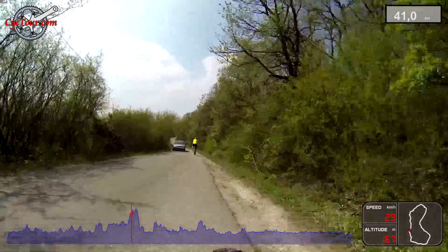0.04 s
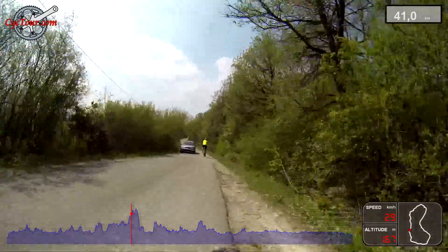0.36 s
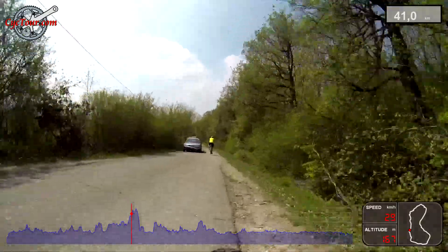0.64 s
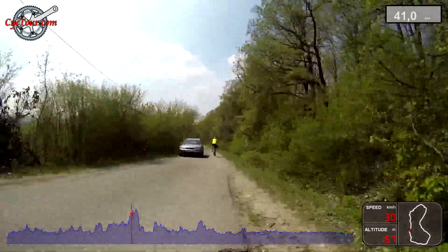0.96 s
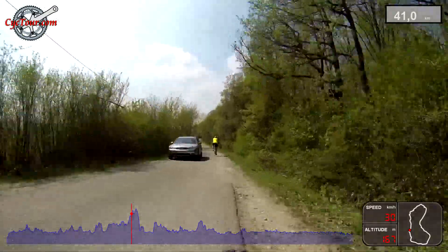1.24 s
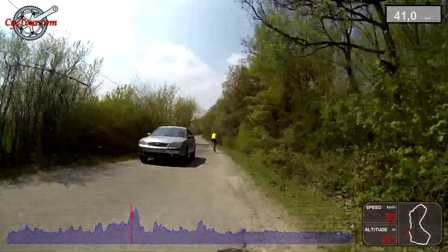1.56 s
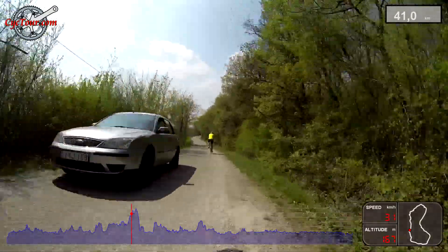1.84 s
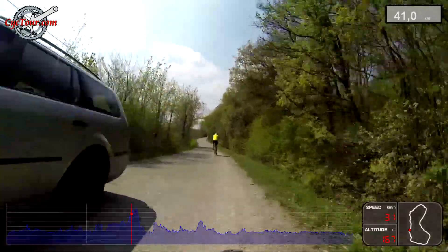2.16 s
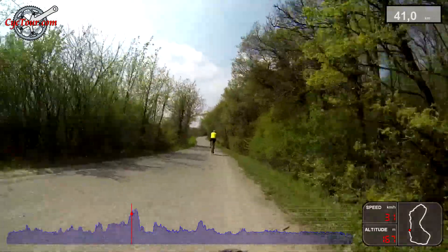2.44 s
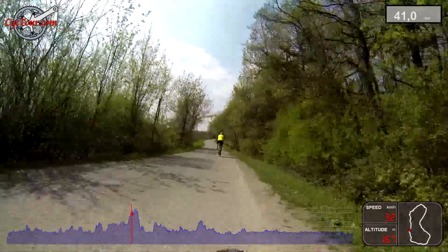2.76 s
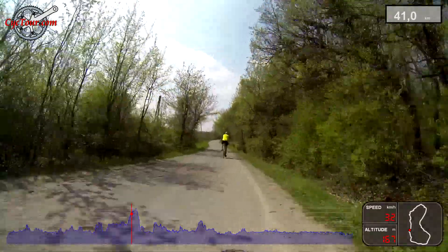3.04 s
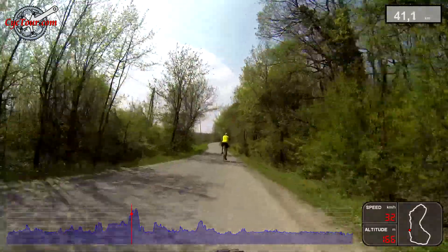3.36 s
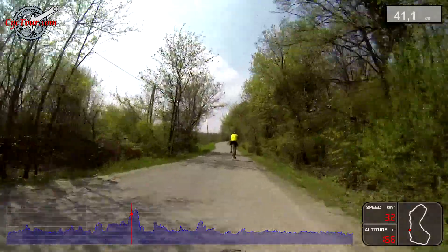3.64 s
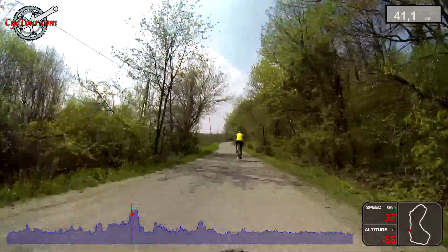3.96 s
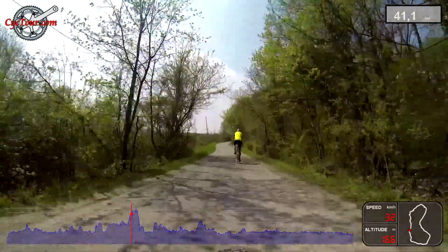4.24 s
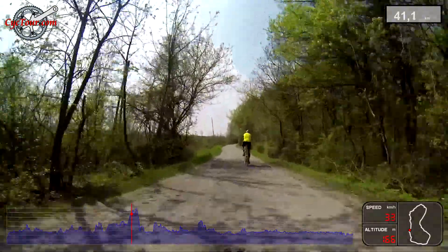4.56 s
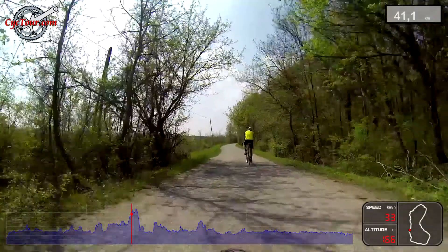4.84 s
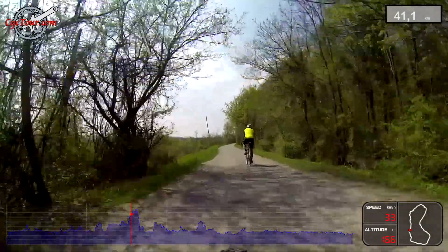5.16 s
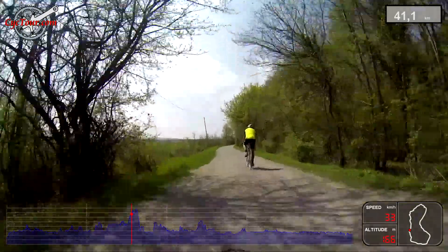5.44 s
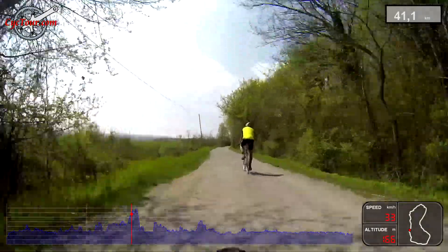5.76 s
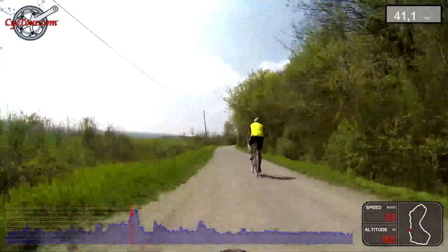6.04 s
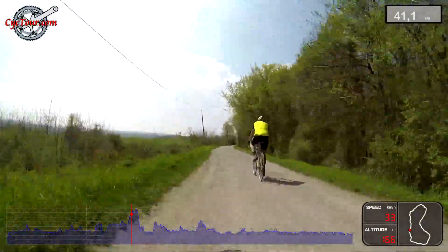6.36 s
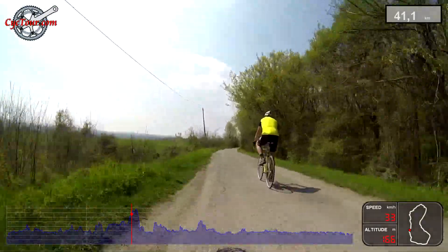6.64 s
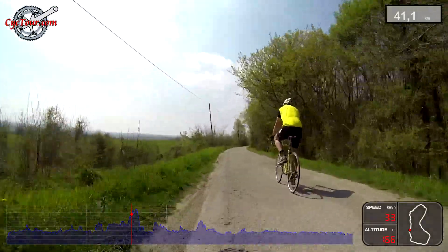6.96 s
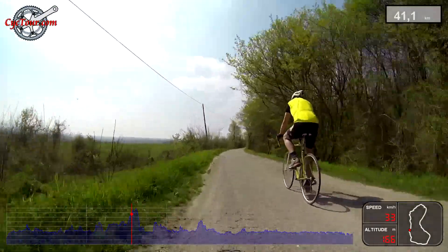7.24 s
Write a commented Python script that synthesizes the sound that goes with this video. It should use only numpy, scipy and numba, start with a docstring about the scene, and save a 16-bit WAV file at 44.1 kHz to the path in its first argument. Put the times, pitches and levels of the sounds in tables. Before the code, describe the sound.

Low wind rumble and a fast, hollow rattle from a rolling bicycle, with bumps, small ticks and one passing car.

```python
"""A country lane, heard from a camera in a plastic housing on a moving bicycle. Wind buffets the
microphone, rough asphalt rattles mount and housing, and bumps knock on it over a rush of air and tyres.
Grit and loose parts tick and jangle; an oncoming car swishes past with a deep boom of pushed air.
Hard jolts and wind pops overload the microphone: the gain control ducks and creeps back."""
import sys
import numpy as np
from scipy import signal
from scipy.fft import rfft, irfft
from scipy.io import wavfile
from scipy.ndimage import map_coordinates
from numba import njit

SR = 44100
rng = np.random.default_rng(int(sys.argv[2]) if len(sys.argv) > 2 else 0)


def store_wav(level_fs):
    """Save 16-bit WAV to argv[1]."""
    pcm = np.round(np.clip(np.atleast_2d(level_fs), -1, 1) * 32767)
    wavfile.write(sys.argv[1], SR, pcm.T.astype(np.int16))


N = 325899

# bright snap of grit and small contacts: f/Hz, relative level/dB
SNAP_SPECTRUM = [(1200, -5.5), (2000, 1.5), (3900, 5.5), (4800, 0), (6000, 2), (7600, -7.5), (9300, -3.5),
                 (10600, -10), (12000, -12), (15000, -32.5)]
# ringing modes of the loose parts: f/Hz, energy share/dB, t60/s
PART_MODES = [(1530, -9, 0.011), (2108, -3.5, 0.018), (2430, -9.5, 0.029), (2924, -11, 0.026),
              (2920, -2.5, 0.0024), (3724, -9, 0.018), (5480, -27.5, 0.017), (9100, -36.5, .014)]


def wind(eddies, gusts_per_s=10, gust_db=1):
    """Turbulence on the microphone port: a low roar in quick lumps."""
    # rise and fall of the buffeting: t/s, level/dB
    gusts = [(0.0, -18.5), (0.12, -17), (0.24, -27), (0.32, -22.5), (0.38, -16), (0.76, -17.5), (1.56, -16),
             (1.64, -20.5), (1.76, -20), (2.58, -18), (2.76, -16), (2.88, -16.5), (3.0, -19), (3.12, -14.5),
             (3.36, -20), (3.48, -14), (3.78, -19.5), (3.9, -16), (3.98, -16.5), (4.38, -18.5), (4.74, -17),
             (4.98, -20), (5.24, -15.5), (5.4, -17.5), (6.84, -16.5), (7.06, -19.5), (7.2, -11.5),
             (7.39, -19)]
    # colour of the roar: f/Hz, relative level/dB
    buffet_spectrum = [(11, -36.5), (18, 1), (38, 1), (65, -2.5), (151, -6.5), (245, -9), (370, -13.5),
                       (416, -11), (518, -17.5), (600, -21.5), (780, -49), (1320, -120)]
    level_db = curves(gusts)[0] + gust_db * wobble(gusts_per_s)
    lumps = amp(.5 * eddies + .6 * wobble(45))
    return amp(level_db) * unit(lumps * noise(buffet_spectrum))


def rattle(level_db, eddies, drone_hz=735, drone_q=6, waver_db=1.5):
    """Asphalt grain shakes the mount; each little blow rings the hollow housing."""
    # resonances of the housing: f/Hz, relative level/dB
    housing_spectrum = [(180, -29.5), (300, -11), (371, -2.5), (416, -8), (487, -10.5), (520, -4),
                        (600, -6), (700, 0.96), (785, 1), (865, 0.5), (1050, -16), (1150, -22), (1500, -47),
                        (2530, -120)]
    # one resonance drones more on some stretches: t/s, lift/dB
    drone_lift = [(0, -0.5), (.3, -0.5), (.6, 0), (3.3, -1), (3.6, 1.5), (5.2, 0.5), (5.6, 1.5),
                  (7.39, 0.5)]
    blows = impacts(rate=480, spread_db=3)
    body = unit(coloured(blows + rng.standard_normal(N), housing_spectrum))
    drone = signal.lfilter(*signal.iirpeak(drone_hz, drone_q, fs=SR), body)
    lift_db = curves(drone_lift)[0] + waver_db * wobble(12)
    return amp(level_db + 0.5 * eddies) * (body + (amp(lift_db) - 1) * drone)


def knocks(upper_ratio=1.86, upper_db=-25, tail_db=-15, tail_t60=0.046):
    """Each knock drives two resonances of the housing for a few cycles; a weak ring follows."""
    # knocks on the housing, some rung by the jolts and pops: t/s, peak level/dB, swell and fade time/s, f/Hz
    hits = [(.178, -7, 0.0032, 720), (.205, 2, .0022, 780), (.215, -7, 0.0026, 740), (.262, -9, .003, 700),
            (.2695, -3, 0.0042, 830), (.279, -6, 0.0036, 720), (0.346, 0, 0.00083, 1010),
            (.3518, 2.5, 0.00075, 850), (.572, -10, 0.0033, 780), (.772, -7.5, 0.0024, 800),
            (1.582, -3.5, 0.0013, 850), (1.834, -4, 0.0017, 800), (2.010, -6.5, 0.0047, 790),
            (2.1555, -2.5, 0.002, 705), (2.540, 11.5, .0016, 770), (3.348, -7, 0.0029, 760),
            (3.529, -8, 0.0034, 740), (3.705, -3, 0.0022, 730), (4.319, -8.5, 0.0038, 740),
            (4.355, -6, .0034, 780), (4.476, -5, 0.002, 760), (4.936, -3, .002, 780),
            (5.058, -5.5, 0.0032, 750), (5.609, -11, 0.0022, 780), (5.874, -13, .002, 780),
            (5.8935, 4.5, 0.0031, 780), (6.055, -6, 0.0024, 760), (6.38, -7, 0.0021, 780)]
    out, t = np.zeros(N), np.arange(-SR // 25, SR // 15) / SR
    for s, db, width, hz in hits:
        tone = np.cos(2 * np.pi * hz * t) + amp(upper_db) * np.sin(2 * np.pi * upper_ratio * hz * t)
        blow = 1 / np.cosh(np.clip(2 * t / width, -20, 20))
        tail = (t > 0) * amp(tail_db - 60 * np.abs(t) / tail_t60)
        add(out, s + t[0], amp(db) * np.maximum(blow, tail) * tone)
    return out


def pops(push_s=0.0015):
    """Each pop is one push and pull of pressure with a tight crack on top."""
    # hard jolts and eddies on the microphone port: t/s, push level/dB, crack level/dB
    jolts = [(0.3466, 4, 4.5), (0.3512, -3.5, 6), (1.582, 0, -6), (1.5849, -8.5, -10), (1.834, -7, -7.5),
             (2.155, 1, -4.5), (2.158, 2, -6), (3.905, -7, -31), (5.7492, -12, -14)]
    # colour of the crack: f/Hz, relative level/dB
    crack_spectrum = [(200, -14.5), (900, 9.5), (1500, 4.5), (2600, 0), (3600, -10.5), (4500, -18),
                      (8000, -37.5), (14000, -37.5)]
    out, u = np.zeros(N), np.arange(SR // 25) / SR / push_s
    push_pull = u * u * (2 - u) * np.exp(2 - 2 * u)
    for s, db, _ in jolts:
        add(out, s - push_s / 2, amp(db) * push_pull)
    times, _, crack_db = np.transpose(jolts)
    return out + coloured(bursts(times - .0005, crack_db, t60=.007, rise_s=.0001), crack_spectrum)


def rush(level_db, eddies, grain_db=-7):
    """Air and tyres hiss through the housing wall, crackling with asphalt grain, fluttering with eddies."""
    # colour of the hiss: f/Hz, relative level/dB
    rush_spectrum = [(700, -39.5), (1050, 0.5), (1500, 0.5), (1900, -5.5), (2650, -12.5), (2950, -18.5),
                     (3450, -19), (3900, -19.5), (4500, -34.5), (5500, -35), (7400, -49), (9200, -49.5),
                     (10800, -58.5), (14000, -84)]
    flutter = amp(1.7 * eddies + 1.1 * wobble(160))
    drive = rng.standard_normal(N) + amp(grain_db) * impacts(rate=980, spread_db=4.0)
    return amp(level_db) * unit(flutter * coloured(drive, rush_spectrum))


def surge(first_stroke_s=.305, stroke_db=0.61, patches_per_s=9, patch_db=0.59):
    """Swing of the rolling noise in dB: regular swells, plus chance patches of coarser asphalt."""
    # pace of the swells, likely the pedal strokes: t/s, rate/Hz
    cadence = [(3.4, 2.8), (3.7, 3.53), (5.9, 3.53), (6.2, 2.7)]
    rate, = curves(cadence)
    strokes = np.cumsum(rate) / SR - first_stroke_s * rate[0]
    return stroke_db * np.cos(2 * np.pi * strokes) + patch_db * wobble(patches_per_s)


def ticks(snap_t60=0.016, scrape=2.5):
    """Grit and loose parts hit the frame: a bright snap, drawn out by the chatter, and a short ring."""
    # contacts: t/s, relative snap level/dB, clack level/dB, chatter length/s, tilt/(dB per octave)
    contacts = [(0.048, -37, -26, 0.0025, -3), (0.095, -57, -26.5, 0.0053, -1),
                (0.2025, -36.5, -17.5, 0.0082, -13), (0.243, -50, -21, 0.0032, -2),
                (0.257, -66, -19, 0.01, -10), (0.331, -53, -23, 0.0034, 3), (0.504, -46, -29, 0.0036, 7),
                (0.613, -66.5, -30.5, 0.0028, 5), (0.847, -63, -22.5, .012, -9), (0.9, -49, -37, .003, 2),
                (1.077, -50, -31, 0.0025, -3), (1.254, -52, -28, 0.004, 2), (1.318, -53, -31, 0.0038, 4),
                (1.441, -40, -19.5, .006, -1), (1.562, -48, -32, 0.0038, 2), (1.611, -42.5, -32, 0.0024, 8),
                (1.857, -49, -29, 0.0027, 0), (1.869, -46, -16.5, 0.008, -8), (2.136, -41, -27, 0.0035, 0),
                (2.205, -38.5, -16, 0.019, -14), (2.265, -47, -21, 0.0038, -1),
                (2.454, -45, -23.5, .008, 0), (2.623, -42, -19, 0.0071, -2), (3.493, -41, -18, 0.0049, -5),
                (3.5738, -50.5, -28.5, 0.0024, -6), (3.591, -49, -33, .001, -2),
                (3.702, -50, -32, 0.00091, -2), (3.796, -42, -21.5, 0.0086, 4), (3.864, -48, -32, 0.001, 0),
                (3.902, -50, -33, .001, 0), (4.04, -44, -29, .003, -4), (4.152, -52, -37, .001, 1),
                (4.179, -54, -32, .002, -2), (4.28, -40, -18.5, 0.0065, -8), (4.46, -47, -32, .004, 5),
                (4.63, -39.5, -26, 0.0053, 1), (4.86, -54, -29.5, .003, 2), (5.056, -42, -22.5, .003, -1),
                (5.752, -50, -18.5, 0.002, -5), (6.089, -42, -36, 0.0012, 14),
                (6.217, -54, -43, 0.0034, -2), (6.6203, -46, -14.5, .002, -2),
                (6.7424, -33, -9.5, 0.0028, 0), (6.9755, -41, -30, 0.003, 14),
                (7.3265, -48, -32, 0.0026, 4), (7.369, -32, -8, 0.00065, 2)]
    times, snap_db, _, chatter, _ = np.transpose(contacts)
    snaps = bursts(times, snap_db + 3.5, t60=snap_t60 + scrape * chatter, rise_s=.0005)
    out = coloured(snaps, SNAP_SPECTRUM)
    for s, _, db, chatter_s, tilt_db in contacts:
        add(out, s, amp(db) * clack(chatter_s, tilt_db))
    return out


def clack(chatter_s, tilt_db, count=4, detune=.015, loose_s=0.0055, rebound_fade_db=-2.5):
    """A loose part strikes; the longer it chatters, up to loose_s, the stronger its uneven rebounds."""
    modes = ring(detune)
    looseness = min(chatter_s / loose_s, 1)
    for fraction in (np.arange(count) + rng.random(count)) / count:
        strength = looseness * amp(rebound_fade_db * fraction)
        for mode, rebound in zip(modes, ring(detune)):
            add(mode, fraction * chatter_s, strength * rebound)
    return voiced(modes, tilt_db)


def ring(detune, rise_s=0.00049):
    """One blow on the loose parts: a row for each dying mode, its pitch scattered by detune."""
    t = np.arange(SR // 12) / SR
    hz, _, t60 = np.transpose(PART_MODES)[:, :, None]
    hz = hz * (1 + detune * rng.standard_normal(hz.shape))
    attack = (1 - np.exp(-t / rise_s)) ** 2
    return attack * amp(-60 * t / t60) * np.sin(2 * np.pi * hz * t)


def voiced(modes, tilt_db):
    """Mix the modes by their energy shares; a harder contact favours the high ones."""
    hz, share_db, _ = np.transpose(PART_MODES)
    octaves = np.clip(np.log2(hz / np.median(hz)) + .2, -.5, .5)
    gains = amp(share_db + tilt_db * octaves) / np.linalg.norm(modes, axis=1)
    return np.sqrt(SR / 1000) * gains @ modes  # 0 dB is the energy of 1 ms at full scale


def car(closest_s=2.084, approach_s=0.15, leave_s=0.16, peak_db=-31.5):
    """Tyre hiss of the oncoming car swells as it nears and fades behind the bicycle."""
    # colour of the car's tyres: f/Hz, relative level/dB
    tyre_spectrum = [(500, -17.5), (1100, 10), (2000, 1.5), (3000, 4.5), (3900, -3), (4600, -15.5),
                     (5600, -15), (7800, -33.5), (9300, -24.5), (11000, -40), (15000, -48.5)]
    t = np.arange(N) / SR - closest_s
    distance = np.hypot(1, t / np.where(t < 0, approach_s, leave_s))
    return amp(peak_db) / distance ** 1.5 * noise(tyre_spectrum)  # spreading plus loss over the verge


def wake(centre_s=1.9, width_s=0.11, peak_db=-18):
    """Air pushed aside by the car throbs on the microphone as a deep boom."""
    # the car's pressure wave: f/Hz, relative level/dB
    boom_spectrum = [(18, -24), (32, -7), (42, 5), (55, -16.5), (100, -39), (400, -120)]
    t = np.arange(N) / SR - centre_s
    return amp(peak_db) * np.exp(-.5 * (t / width_s) ** 2) * noise(boom_spectrum)


def jangle(grit_count=45):
    """Loose parts chatter against the frame, with a faint patter of fine grit."""
    # chatter flares on broken stretches of road, then settles: t/s, level/dB
    chatter_levels = [(0, -41), (.1, -42), (.16, -48.5), (.21, -39), (.265, -38), (.3, -51), (.36, -42),
                      (.5, -49.5), (3.75, -49), (3.81, -43), (3.95, -50), (4.3, -44), (4.7, -51),
                      (5.13, -46), (5.3, -49), (7.39, -46.5)]
    level_db, = curves(chatter_levels)
    blows = impacts(rate=260, spread_db=6.5)
    chatter = unit(signal.fftconvolve(blows, voiced(ring(detune=0), tilt_db=0))[:N])
    when, size = rng.random((grit_count, 2)).T
    grit = bursts(when * N / SR, -59 + 8 * size, t60=0.014, rise_s=.0003)
    return amp(level_db) * chatter + coloured(grit, SNAP_SPECTRUM)


def amp(db):
    """Decibels to gain."""
    return 10 ** (np.asarray(db) / 20)


def unit(x):
    """Scale to rms 1."""
    return x / np.sqrt(np.mean(x ** 2) + 1e-20)


def curves(rows):
    """One value per sample for each column after the time."""
    times, *columns = np.transpose(rows)
    return [np.interp(np.arange(N) / SR, times, column) for column in columns]


def wobble(rate):
    """A smooth random curve, rate knots a second."""
    return map_coordinates(rng.standard_normal(int(N * rate / SR) + 4), [np.arange(N) * rate / SR])


def coloured(x, spectrum, size=16384):
    """x through a causal filter of energy 1, shaped by rows of f/Hz, level/dB."""
    hz, db = np.transpose(spectrum)
    grid = np.fft.rfftfreq(size, 1 / SR)
    gain = amp(np.interp(np.log(grid + 1), np.log(hz + 1), db))
    cepstrum = irfft(np.log(gain + 1e-6))
    cepstrum[1:size // 2] *= 2  # minimum phase keeps attacks sharp
    cepstrum[size // 2 + 1:] = 0
    response = irfft(np.exp(rfft(cepstrum)))
    return signal.fftconvolve(x, response / np.linalg.norm(response))[:N]


def noise(spectrum):
    """Coloured noise of rms 1."""
    return unit(coloured(rng.standard_normal(N), spectrum))


def impacts(rate, spread_db):
    """Randomly timed impulses of uneven size, rms 1."""
    hit = rng.random(N) < rate / SR
    size = amp(spread_db * np.clip(rng.standard_normal(N), -2, 2))
    return unit(hit * size * rng.choice([-1, 1], N))


def bursts(times, levels_db, t60, rise_s):
    """Short scraping contacts: white noise that builds and dies after each time."""
    envelope, t = np.zeros(N), np.arange(SR // 10) / SR
    for s, db, life in np.broadcast(times, levels_db, t60):
        add(envelope, s, amp(db - 60 * t / life) * (1 - np.exp(-t / rise_s)))
    return envelope * rng.choice([-1, 1], N)


def add(track, s, sound):
    """Mix a sound into the track from time s on."""
    part = track[max(round(s * SR), 0):][:len(sound)]
    part += sound[:len(part)]


@njit
def ducking(excess, attack, release):
    """Gain reduction in dB: chases any excess quickly, then lets go at a steady pace."""
    cut, out = 0., np.zeros(len(excess))
    for i in range(len(excess)):
        cut = cut + attack * (excess[i] - cut) if excess[i] > cut else max(cut - release, 0.)
        out[i] = cut
    return out


def scene():
    """The mono mix at the microphone; the same eddies stir wind, rattle and rush."""
    # rougher and smoother stretches of asphalt: t/s, rattle level/dB, rush level/dB
    road = [(0.0, -14.5, -32), (0.15, -17.5, -38), (0.31, -19.5, -36.5), (0.45, -18, -34.5),
            (0.56, -14.5, -32), (0.68, -18.5, -34.5), (0.84, -15, -29.5), (0.98, -20, -36),
            (1.14, -17, -31.5), (1.82, -17, -32), (1.95, -22, -39), (2.08, -15.5, -31.5),
            (2.42, -14.5, -27), (2.52, -14.5, -33), (2.62, -13, -26.5), (2.8, -15.5, -27),
            (3.0, -17, -36.5), (3.16, -18.5, -29), (3.28, -19.5, -36), (3.42, -17, -34.5),
            (3.78, -17.5, -29.5), (3.9, -21, -34.5), (4.26, -16, -29.5), (4.98, -16.5, -31.5),
            (5.17, -15.5, -28.5), (5.28, -19, -34), (5.42, -16.5, -32), (5.88, -16, -28.5),
            (6.26, -21.5, -35), (6.44, -16.5, -29.5), (6.56, -19.5, -34.5), (7.2, -15.5, -31.5),
            (7.39, -17.5, -29.5)]
    rattle_db, rush_db = curves(road)
    eddies, surge_db = wobble(35), surge()
    riding = wind(eddies) + rattle(rattle_db + surge_db, eddies) + rush(rush_db + surge_db, eddies)
    return (riding + car() + jangle() + ticks() + knocks() + pops() + wake())[None]


def record(dry, ceiling_db=-6.0, attack_s=0.00092, release_db_per_s=42, top_hz=14500):
    """Gain control ducks after each overload; what slips through soft-clips; the top is rolled off."""
    excess_db = 20 * np.log10(np.abs(dry[0]) + 1e-9) - ceiling_db
    cut_db = ducking(excess_db, min(1 / (attack_s * SR), 1), release_db_per_s / SR)
    levelled = dry * amp(-cut_db)
    clipped = levelled / (1 + levelled ** 8) ** (1 / 8)
    return signal.sosfilt(signal.butter(16, top_hz, fs=SR, output="sos"), clipped)


dry = scene()
out = record(dry)
store_wav(out)
```